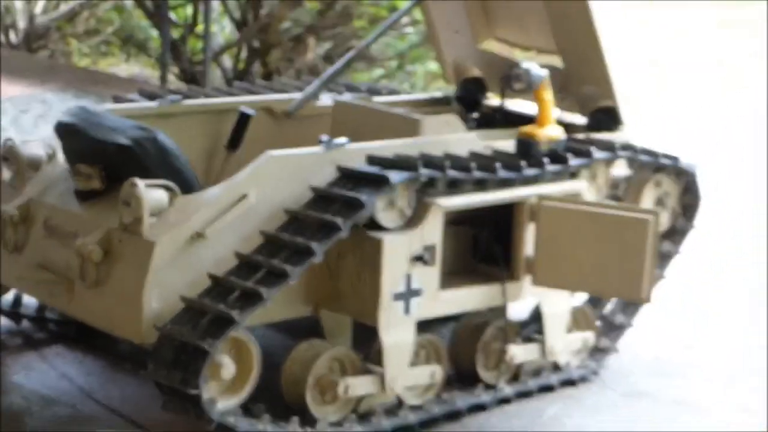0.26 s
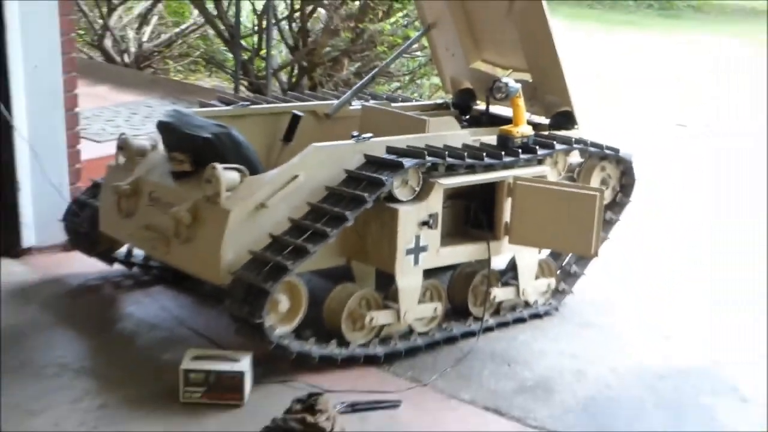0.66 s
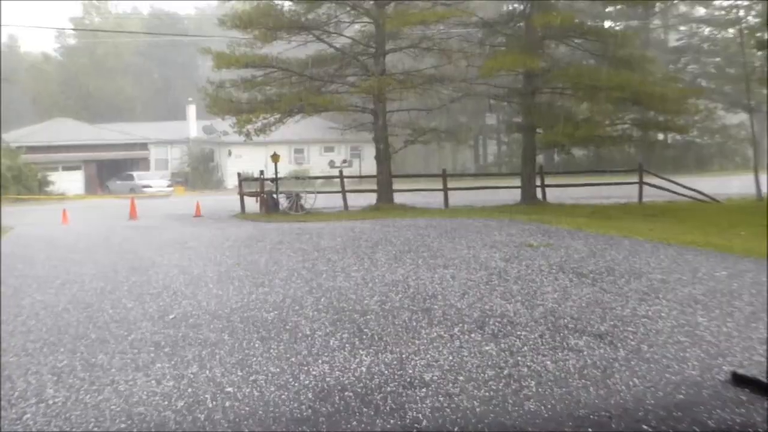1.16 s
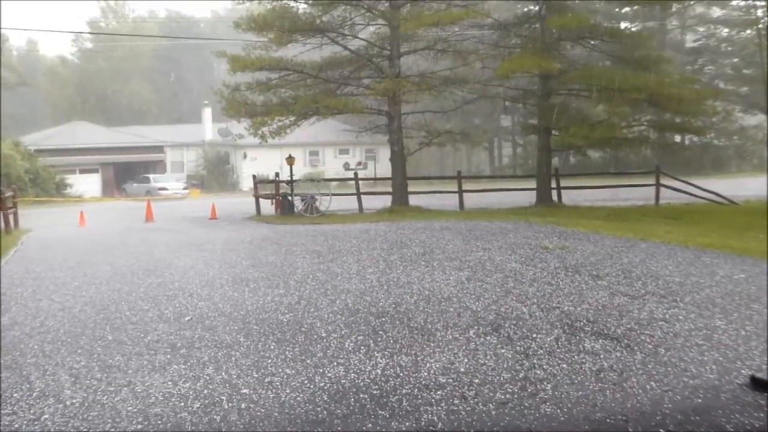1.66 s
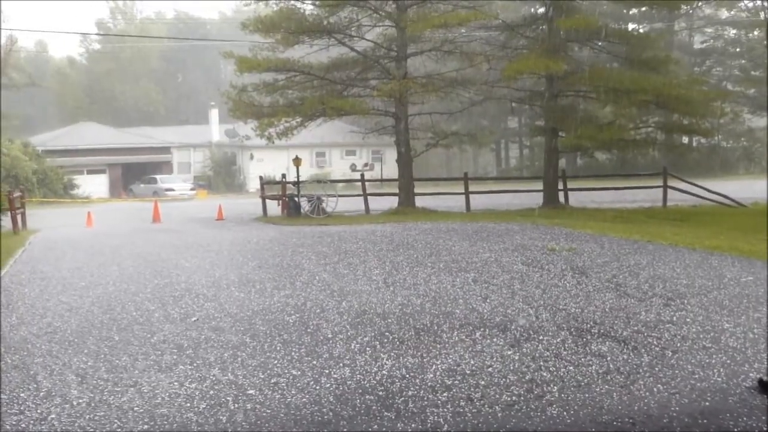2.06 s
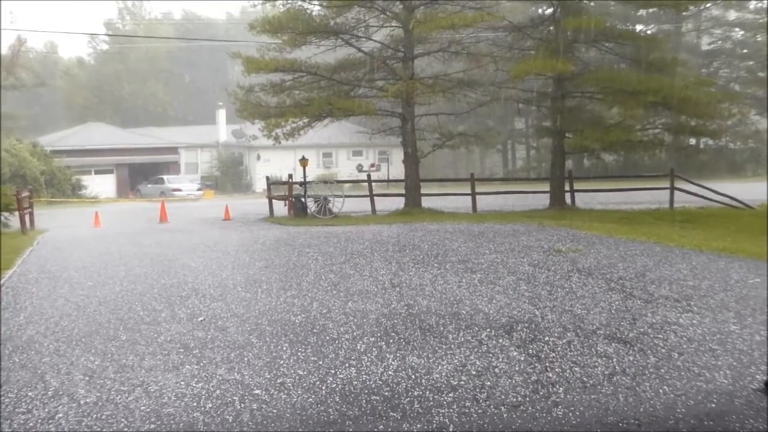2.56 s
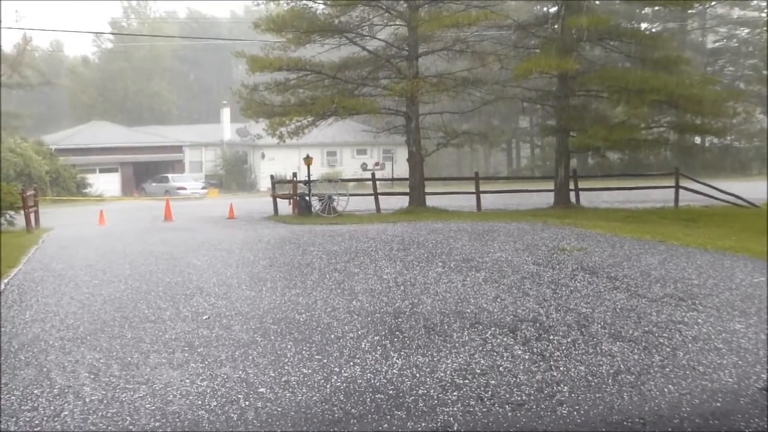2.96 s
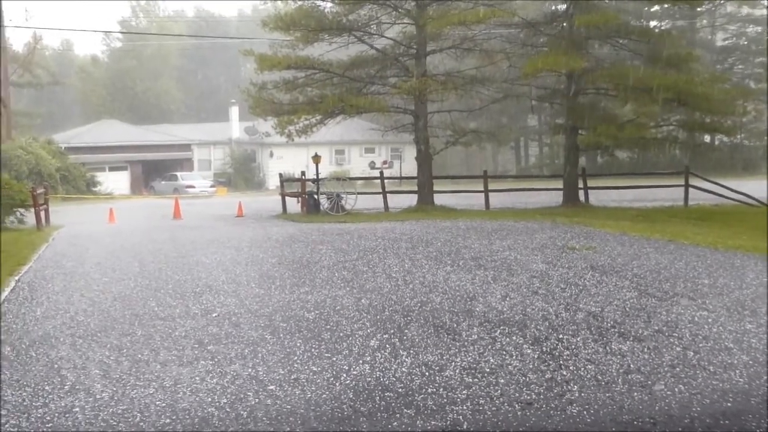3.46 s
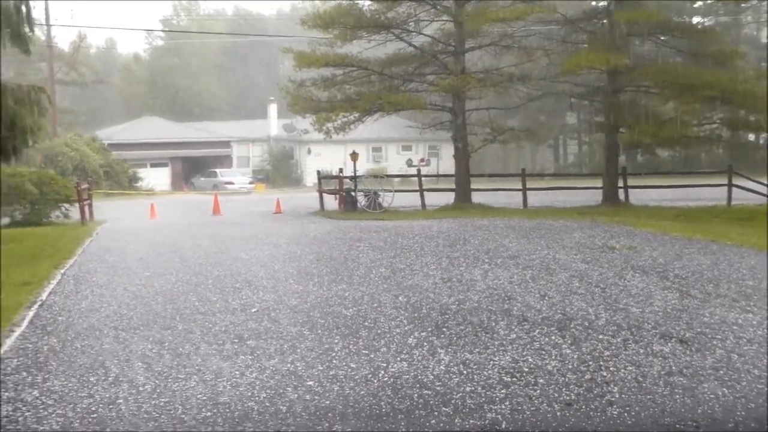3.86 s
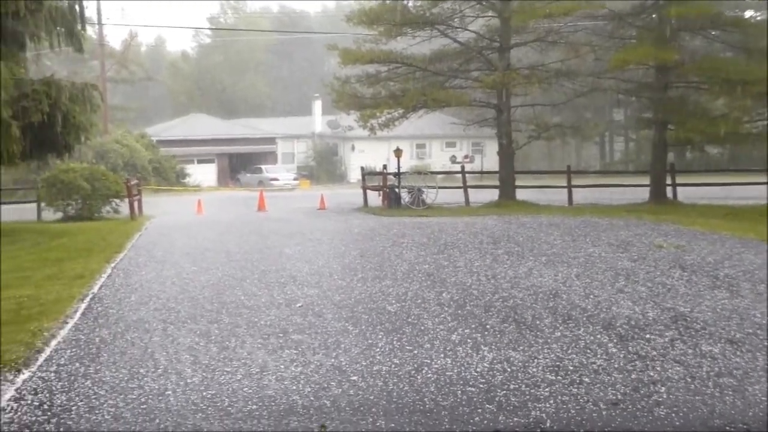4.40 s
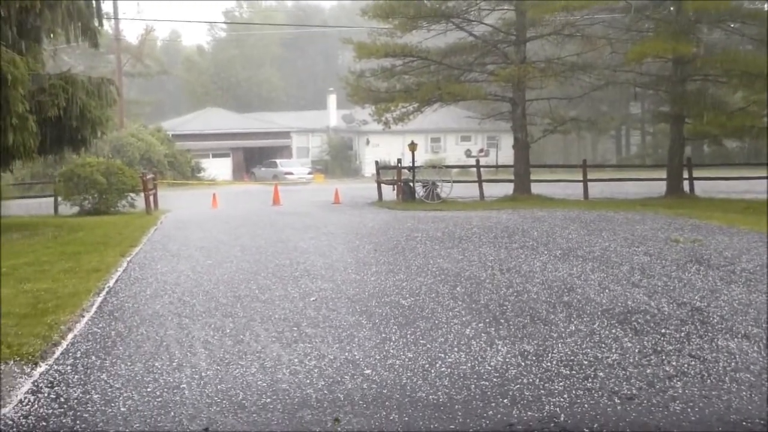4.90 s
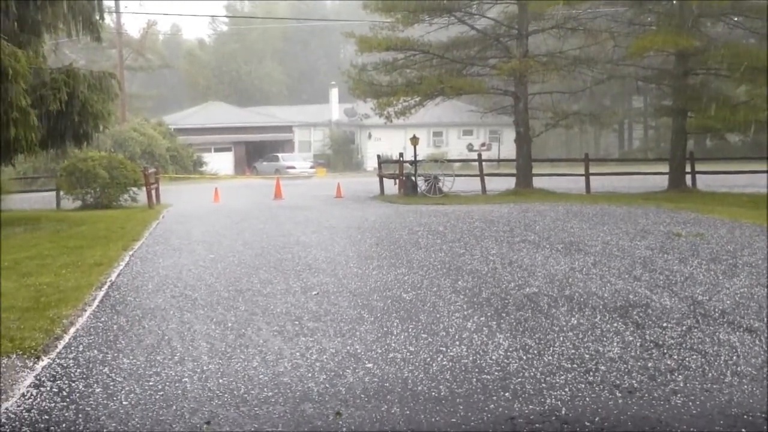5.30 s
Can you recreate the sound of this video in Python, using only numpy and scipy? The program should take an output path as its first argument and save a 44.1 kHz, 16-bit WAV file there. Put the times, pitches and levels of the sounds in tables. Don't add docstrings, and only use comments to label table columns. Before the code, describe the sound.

Camera ticks, two hard snaps and a small motor whirr over faint outdoor hum, then a gap and sudden heavy hail pelting asphalt.

```python
import sys
import numpy as np
from scipy import signal
from scipy.fft import rfft, irfft
from scipy.io import wavfile
from scipy.ndimage import uniform_filter1d

SR = 44100
rng = np.random.default_rng(int(sys.argv[2]) if len(sys.argv) > 2 else 0)


def elevation(decibels):
    levels = np.asarray(decibels, float)
    return 10 ** (levels / 20)


def log_audio(samples):
    frames = np.atleast_2d(samples).T
    limited = np.clip(frames, -1, 1)
    pcm = np.round(limited * 32767).astype(np.int16)
    wavfile.write(sys.argv[1], SR, pcm)


N = 244314
DOORWAY_END_S, STORM_START_S = 1.0765, 1.3662

# pitch_hz, level_db (per Hz)
YARD_COLOUR = [(25, -49), (60, -22.5), (110, -12.5), (230, -9.5), (400, -14.5), (900, -15), (2000, -20.5),
               (4000, -27.5), (7500, -35), (10000, -33), (15700, -42.5)]
# pitch_hz, likeness (-1 to 1)
YARD_LIKENESS = [(60, 0.91), (180, 0.99), (550, 0.43), (1650, -0.19), (4970, 0.26), (15000, 0.32)]
YARD_DB, YARD_FADE_DB_PER_S = -52, -4.5

# multiple (of the hum pitch), level_db
HUM_TONES = [(0.999, -60.5), (2, -59.5), (3, -76.5)]
HUM_HZ = 114.6
PANEL_HZ, PANEL_WIDTH_HZ, PANEL_DB = 158, 29, -67.5

DRAUGHT_DB = -68

WHINE_START_S, WHINE_END_S, WHINE_FROM_HZ, WHINE_TO_HZ, WHINE_DB = .17, .45, 510.5, 430, -68

# pitch_hz, width_hz, level_db
BARREL_MODES = [(3235, 330, 0), (4330, 1500, -10), (9500, 2500, -11.5), (12960, 3000, -13)]
ZOOM_START_S, ZOOM_RUN_S, ZOOM_STOP_S, ZOOM_RELEASE_S = .12, .35, .727, .013
ZOOM_CREEP_DB, ZOOM_RUN_DB, ZOOM_SAG_DB = -76, -56.5, -1
ZOOM_STEPS_PER_S, ZOOM_SPEEDUP_PER_S2 = 172, 160

# start_s, crack_db, crack_hz, body_db, pan_db (left minus right)
TICKS = [(.0024, -42, 6000, -44, -2), (0.066, -32, 10500, -42, -10), (.1818, -33, 6000, -46, .6),
         (.1984, -48, 8000, -45, -3), (.2049, -47, 7500, -43, 1.1), (.2565, -54, 8000, -48, 0.1),
         (.2733, -52, 9000, -47, .6), (.2848, -40, 10500, -47, -3), (.3004, -54, 11000, -48, -.6),
         (.3254, -48, 9000, -52, 3), (.3304, -50, 7000, -49, -2.1), (0.3395, -29, 8450, -38, -4),
         (0.5094, -33, 8900, -47, -7), (.5200, -31, 12000, -49, -7), (.725, -50, 9500, -60, 0.1)]
BODY_SHARE = 0.41
# start_s, peak_db, pan_db (left minus right), bare_db (share of the bare blow)
SNAPS = [
    (0.1556, -15.5, 2.5, -1.5),
    (0.5603, -10, -9, -10),
]
# pitch_hz, width_hz, level_db
SNAP_MODES = [
    [(844, 260, -9), (1380, 920, 1.5), (3300, 330, -2), (5150, 1500, 1), (7200, 2700, -0.5),
     (10500, 4400, -4), (13500, 3800, -3)],
    [(1020, 630, -12.5), (2100, 900, -16.5), (4400, 600, -6), (6470, 1700, -2), (8000, 2300, 0),
     (9900, 2500, -3.5), (13000, 3500, -16)],
]
# start_s, level_db
PINGS = [
    (0, -52),
    (0.0666, -37.5),
]
# pitch_hz, level_db, t60_s
PING_MODES = [(2320, 2.5, 0.071), (3020, -10.5, .045)]
# start_s, level_db, pitch_hz
KNOCKS = [
    (.1825, -45, 1100),
    (.3304, -55, 1790),
    (.5094, -48, 2100),
    (0.9662, -45, 400),
    (0.999, -44, 380),
]

# pitch_hz, level_db
HAIL_COLOUR = [(25, -47), (54, -31), (168, -8.5), (244, -0.5), (395, -3.5), (560, -0.5), (730, -1.5),
               (900, -5.5), (1350, -8), (3110, -7), (5910, -10.5), (7940, -16.5), (9840, -13.5),
               (15100, -24.5)]
# pitch_hz, level_db (side minus mid)
HAIL_WIDTH = [(40, -21), (90, -22), (200, -18), (380, -21), (700, -14), (1290, -6.5), (2380, -8),
              (4400, -7.5), (8120, -6.5), (15000, -4)]
ROOF_TOP_HZ, SPRAY_FROM_HZ = 900, 4500
STORM_LEAN_DB = 0.27

SURFACE_DB = -28.5, -25.5, -27
SURFACE_GUST_SHARE = 1.7, 0.49, 0.59
SURFACE_EASING_DB_PER_S = -0.12, -.25, -0.04

# start_s (peak), level_db
GUSTS = [
    (1.38, 1.1),
    (1.87, 1.6),
    (4.21, 0.57),
    (4.92, 1.6),
    (5.51, .8),
]
GUST_S = 0.037

# start_s, level_db, pitch_hz
ON_ASPHALT = [
    (1.818, -22, 5500),
    (2.82, -23, 6000),
    (3.337, -22, 7000),
    (3.989, -21, 6500),
]
ON_ROOF = [
    (1.874, -22, 1300),
    (3.241, -26, 500),
    (4.209, -19, 547),
    (4.66, -19.5, 630),
    (4.905, -22, 600),
    (4.92, -25, 1100),
    (4.99, -19, 680),
]
ON_PANEL = [
    (1.858, -22.5, 3130),
    (1.872, -27, 1990),
    (5.024, -27, 2980),
]
VOLLEY = [
    (1.856, -20.5, 2870),
]
# width (share of pitch), rise_s, t60_s
ASPHALT, ROOF = (1, 0.004, 0.091), (0.7, .007, 0.17)
PANEL, SCATTER = (0.15, .007, 0.35), (1.05, .008, 0.38)


def evened(x):
    return x / np.sqrt(np.mean(x ** 2) + 1e-20)


def read(points, hz):
    f, value = np.transpose(points)
    return np.interp(np.log(hz + 1), np.log(f + 1), value)


def add(mix, start_s, sound):
    part = mix[:, round(start_s * SR):][:, :sound.shape[-1]]
    part += sound[..., :part.shape[1]]


def low_cut(x, hz):
    return signal.sosfilt(signal.butter(2, hz, "high", fs=SR, output="sos"), x)


def wander(noise, size):
    return evened(uniform_filter1d(uniform_filter1d(noise, size), size))


def left_right(pan_db):
    return elevation(pan_db * np.array([[.5], [-.5]]))


def resonate(x, hz, width):
    r = np.exp(-np.pi * width / SR)
    return 2 * signal.lfilter([1 - r], [1, -r * np.exp(2j * np.pi * hz / SR)], x).real


def steep(x, hz, width):
    return resonate(resonate(x, hz, width), hz, width)


def yard():
    hz, _, (left, other) = signal.stft(rng.standard_normal((2, N)), SR, nperseg=1024)
    same = np.clip(read(YARD_LIKENESS, hz), -1, 1)[:, None]
    right = same * left + np.sqrt(1 - same ** 2) * other
    z = np.array([left, right]) * elevation(read(YARD_COLOUR, hz))[:, None]
    air = evened(signal.istft(z, SR, nperseg=1024)[1][:, :N])
    return air * elevation(YARD_DB + YARD_FADE_DB_PER_S * np.arange(N) / SR)


def hum():
    drift, *swells = (wander(noise, 2500) for noise in rng.standard_normal((4, N)))
    turns = np.cumsum(HUM_HZ * (1 + 0.0077 * drift)) / SR
    tones = 0
    for (multiple, db), swell in zip(HUM_TONES, swells):
        tones = tones + elevation(db + 0.5 + 1.8 * swell) * np.sin(2 * np.pi * multiple * turns)
    panel = evened(steep(rng.standard_normal(N), PANEL_HZ, PANEL_WIDTH_HZ))
    return tones + elevation(PANEL_DB) * panel


def draught():
    lumps = wander(rng.standard_normal((2, N)), 1500)
    rumble = evened(steep(rng.standard_normal((2, N)), 96, 50))
    return elevation(DRAUGHT_DB + 4.1 * lumps) * rumble


def whine():
    t = np.arange(N) / SR
    passed = np.clip((t - WHINE_START_S) / (WHINE_END_S - WHINE_START_S), 0, 1)
    flutter = evened(uniform_filter1d(rng.standard_normal(N), 900))
    turns = np.cumsum(WHINE_FROM_HZ + (WHINE_TO_HZ - WHINE_FROM_HZ) * passed) / SR
    return elevation(WHINE_DB + 2.5 * flutter) * np.sin(np.pi * passed) * np.sin(2 * np.pi * turns)


def zoom_motor():
    t = np.arange(N) / SR
    rate = ZOOM_STEPS_PER_S + ZOOM_SPEEDUP_PER_S2 * np.maximum(t - ZOOM_RUN_S, 0)
    jitter = .45 * uniform_filter1d(rng.standard_normal(N), 300)
    turns = np.cumsum(rate * (1 + jitter)) / SR
    clicks = np.diff(np.floor(turns), prepend=0) * elevation(1.4 * rng.standard_normal(N))
    puffs = (.25 + np.exp(-(turns % 1) / .3)) * rng.standard_normal((2, N))

    (hz, width, _), *whirr = BARREL_MODES
    ring = evened(steep(evened(clicks) + .3 * evened(puffs), hz, width))
    for hz, width, db in whirr:
        ring += elevation(db) * evened(steep(puffs, hz, width))

    level_db = np.interp(t, (ZOOM_START_S, ZOOM_RUN_S, ZOOM_STOP_S),
                         (ZOOM_CREEP_DB, ZOOM_RUN_DB, ZOOM_RUN_DB + ZOOM_SAG_DB))
    release = np.clip(1 - (t - ZOOM_STOP_S) / ZOOM_RELEASE_S, 0, 1) ** 2
    return elevation(level_db) * ring * (t > ZOOM_START_S) * release


def crack(length, pan_db, rise, t60):
    noise = rng.standard_normal((3, length))
    t = np.arange(length) / SR
    fall = elevation(-60 * t / t60) + 0.051 * elevation(-60 * t / 0.042)
    spikes = (noise[0] + 0.5 * noise[1:]) * abs(noise[0])
    return spikes * (1 - np.exp(-t / rise)) ** 2 * fall * left_right(pan_db)


def case_ticks():
    out = np.zeros((2, N))
    for start_s, crack_db, crack_hz, body_db, pan_db in TICKS:
        blow = crack(800, pan_db, rise=.0005, t60=.0075)
        body_hz = BODY_SHARE * crack_hz
        for db, hz, width in (crack_db, crack_hz, 0.91 * crack_hz), (body_db, body_hz, 0.39 * body_hz):
            ring = steep(blow, hz, width)
            add(out, start_s, elevation(db) * ring / abs(ring).max())
    return out


def lever_snaps():
    out = np.zeros((2, N))
    for (start_s, peak_db, pan_db, bare_db), modes in zip(SNAPS, SNAP_MODES):
        blow = crack(1200, pan_db, rise=.0003, t60=.006)
        blow[:, 12] += 5.0 * left_right(pan_db)[:, 0]
        blow = low_cut(blow, 600)
        ring = elevation(bare_db) * evened(resonate(blow, 5000, 9000))
        for hz, width, db in modes:
            ring += elevation(db) * evened(steep(blow, hz, width))
        add(out, start_s, elevation(peak_db + 5) * ring / abs(ring).max())
    return out


def pings_and_knocks():
    out, t = np.zeros((2, N)), np.arange(4000) / SR
    for start_s, level_db in PINGS:
        for hz, db, t60 in PING_MODES:
            add(out, start_s, elevation(level_db + db - 60 * t / t60) * np.sin(2 * np.pi * hz * t))
    for start_s, db, hz in KNOCKS:
        fall = elevation(db + 7 - 60 * t / .011)
        add(out, start_s, fall * np.cos(2 * np.pi * hz * t) * (1 - np.exp(-t / .0002)))
    return out


def ringing_stones(per_s, t60, level_db):
    t, out = np.arange(4096) / SR, np.zeros((2, N))
    for hz in np.geomspace(240, 4000, num=48) * rng.uniform(.97, 1.03, size=48):
        when, luck = rng.random((2, round(per_s * N / SR)))
        size = elevation(2.0 * np.minimum(-np.log(luck), 3))
        strikes = np.bincount((when * N).astype(int), size, N)
        fall = elevation(-60 * t / t60 * (hz / 1000) ** 0.2)
        note = np.sin(2 * np.pi * hz * t) * fall * (1 - np.exp(-t / 0.0013))
        ring = evened(signal.oaconvolve(strikes, note)[:N])
        ring *= elevation(read(HAIL_COLOUR, hz)) * np.sqrt(hz)
        out += ring * elevation(rng.uniform(-2.2, 2.4) * np.array([[1], [-1]]))
    return elevation(level_db) * evened(out)


def big_stones():
    out, t = np.zeros((2, N)), np.arange(SR // 4) / SR
    struck = (ON_ASPHALT, ASPHALT), (ON_ROOF, ROOF), (ON_PANEL, PANEL), (VOLLEY, SCATTER)
    for hits, (share, rise, t60) in struck:
        for start_s, db, hz in hits:
            mid, side = rng.standard_normal((2, len(t)))
            burst = steep(np.array([mid + 0.27 * side, mid - 0.24 * side]), hz, share * hz)
            swell = elevation(db - 60 * t / t60) * (1 - np.exp(-t / rise))
            add(out, start_s - rise, swell * evened(burst))
    return low_cut(out, 220)


def gusts_db(t):
    return sum(db * np.exp(-((t - s) / GUST_S) ** 2) for s, db in GUSTS)


def stones_falling(per_s, spread_db, tail_s):
    size = elevation(spread_db * np.minimum(rng.exponential(1, N), 6))
    falls = rng.random(N) < per_s / SR
    clicks = size * falls * rng.choice([-1., 1.], N)
    t = np.arange(2048) / SR
    tail = rng.choice([-1., 1.], len(t)) * elevation(-60 * t / tail_s)
    tail = irfft(np.exp(1j * np.angle(rfft(tail, 4096))))
    return evened(signal.oaconvolve(clicks, tail)[:N])


def hail():
    t = np.arange(N) / SR
    gust = gusts_db(t)
    near_stones = [elevation(-9.) * stones_falling(per_s=260., spread_db=4.0, tail_s=0.029),
                   elevation(-6.) * stones_falling(per_s=700., spread_db=3.5, tail_s=0.019),
                   elevation(-4.) * stones_falling(per_s=1100., spread_db=3.0, tail_s=0.0078)]
    patchy_db = [1.2, .8, .6]
    out = 0
    for k in range(3):
        wash = evened(rng.standard_normal(N) + near_stones[k])
        hz, _, z = signal.stft([wash, rng.standard_normal(N)], SR, nperseg=1024, noverlap=768)
        roof = 1 / (1 + (hz / ROOF_TOP_HZ) ** 6)
        below_spray = 1 / (1 + (hz / SPRAY_FROM_HZ) ** 6)
        share = [roof, below_spray - roof, 1 - below_spray][k]
        patches = uniform_filter1d(rng.standard_normal(z.shape[1:]), 12, 0)
        patches = evened(uniform_filter1d(patches, 8, 1))
        z *= elevation(read(HAIL_COLOUR, hz)[:, None] + patchy_db[k] * patches)
        z *= np.sqrt(abs(share))[:, None]
        z[1] *= elevation(read(HAIL_WIDTH, hz))[:, None]
        mid, side = signal.istft(z, SR, nperseg=1024, noverlap=768)[1][:, :N]
        easing_db = SURFACE_EASING_DB_PER_S[k] * (t - STORM_START_S)
        level = elevation(SURFACE_DB[k] + easing_db + SURFACE_GUST_SHARE[k] * gust) / mid.std()
        out = out + level * np.array([mid + side, mid - side])
    return out


def scene():
    handling = case_ticks() + lever_snaps() + pings_and_knocks()
    doorway = yard() + hum() + whine() + zoom_motor() + handling
    storm = draught() + ringing_stones(per_s=12., t60=0.11, level_db=-33.) + big_stones() + hail()
    storm *= left_right(STORM_LEAN_DB)
    middle_of_gap_s = (DOORWAY_END_S + STORM_START_S) / 2
    return np.where(np.arange(N) / SR < middle_of_gap_s, doorway, storm)


def roll_off(x):
    return signal.sosfilt(signal.butter(12, 16290, fs=SR, output="sos"), x)


def record(dry):
    x = low_cut(dry, 60)
    below, whole = (signal.oaconvolve(x, signal.firwin(1023, hz, window=("kaiser", 9), fs=SR)[None], "same")
                    for hz in (15170, 15500))
    open_blocks = rng.random(N // 2048 + 1) < .36
    top_open = uniform_filter1d(1. * np.repeat(open_blocks, 2048)[:N], size=512)
    x = below + top_open * (whole - below)
    t = np.arange(N) / SR
    fade_in = np.clip((t - STORM_START_S) / .0005, 0, 1)
    return roll_off(x * ((t < DOORWAY_END_S) + fade_in))


dry = scene()
out = record(dry)
log_audio(out)
```